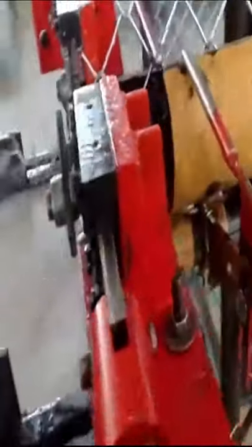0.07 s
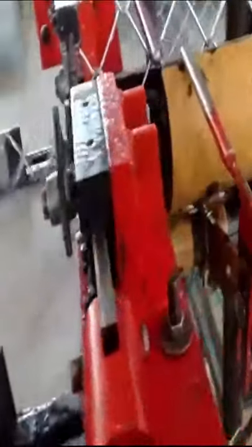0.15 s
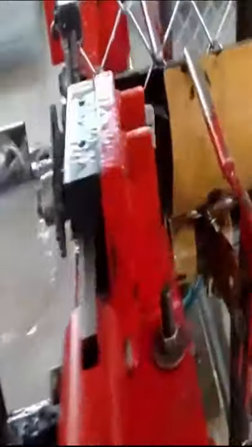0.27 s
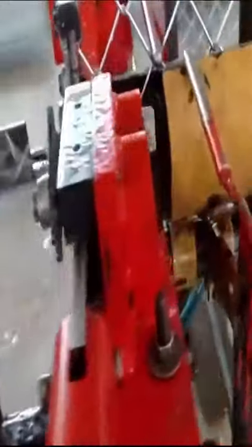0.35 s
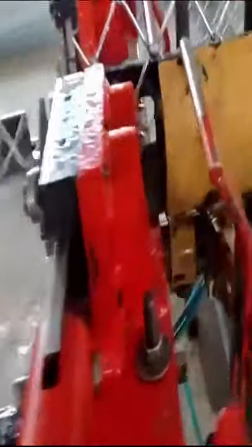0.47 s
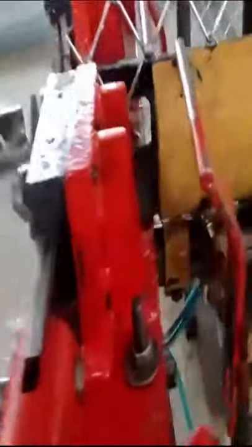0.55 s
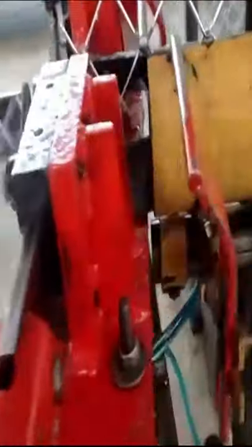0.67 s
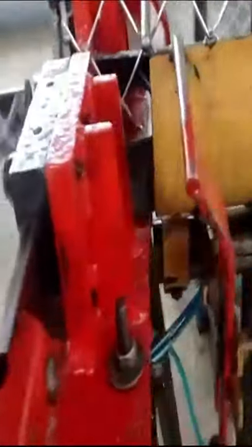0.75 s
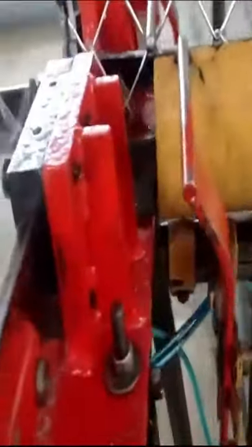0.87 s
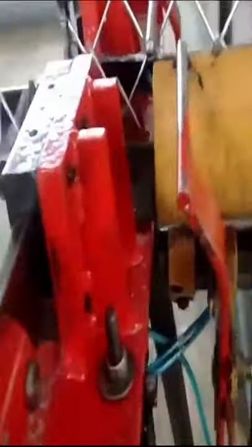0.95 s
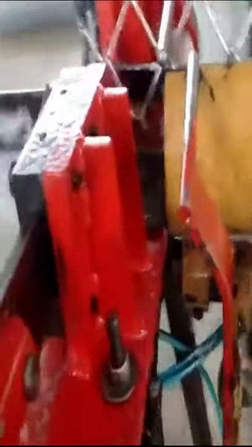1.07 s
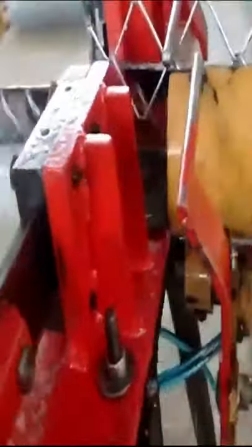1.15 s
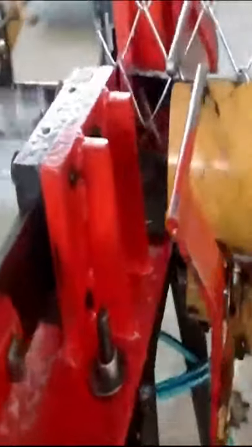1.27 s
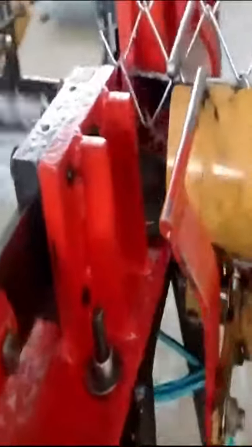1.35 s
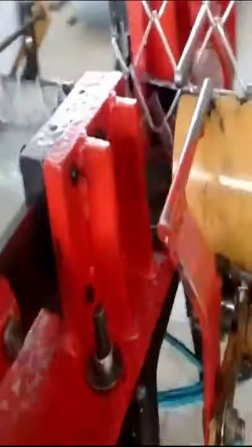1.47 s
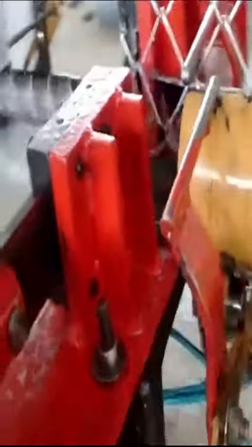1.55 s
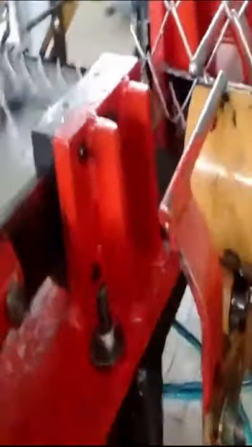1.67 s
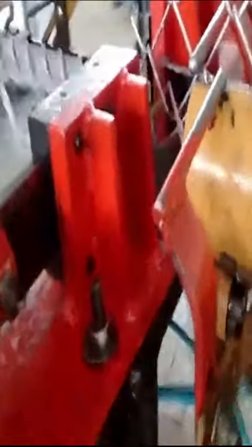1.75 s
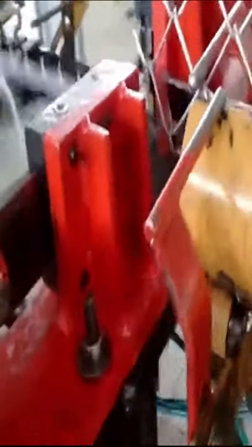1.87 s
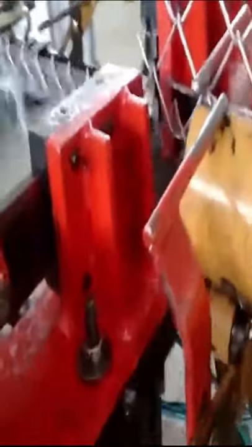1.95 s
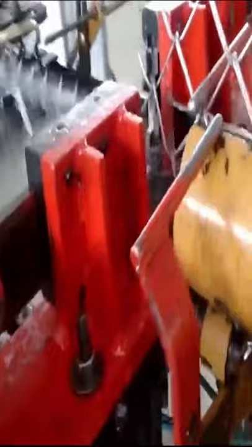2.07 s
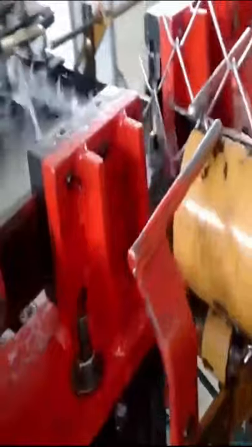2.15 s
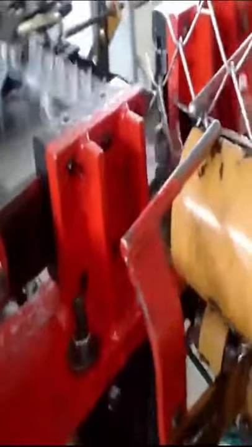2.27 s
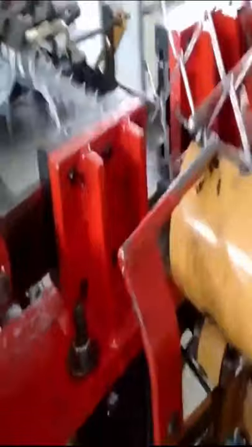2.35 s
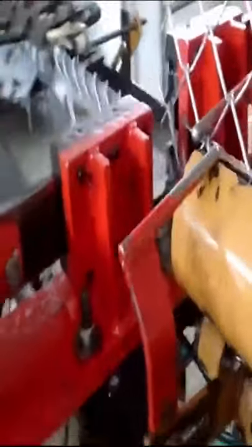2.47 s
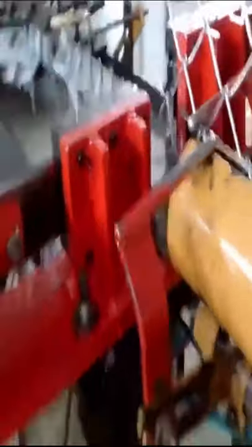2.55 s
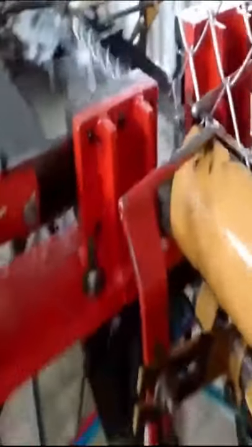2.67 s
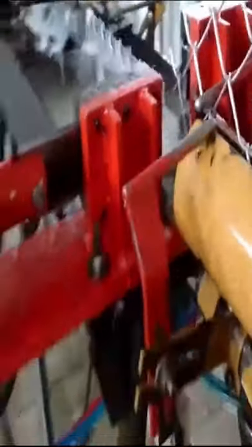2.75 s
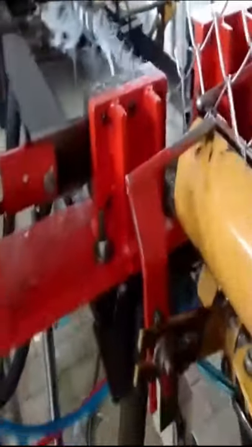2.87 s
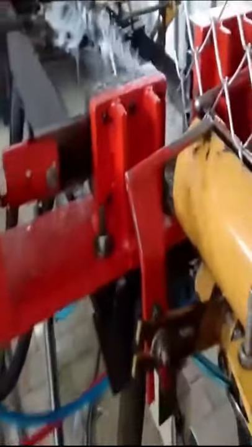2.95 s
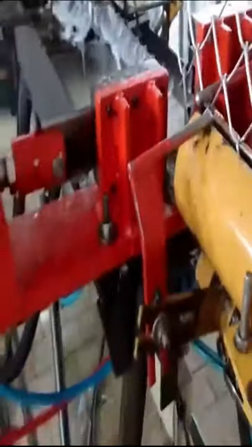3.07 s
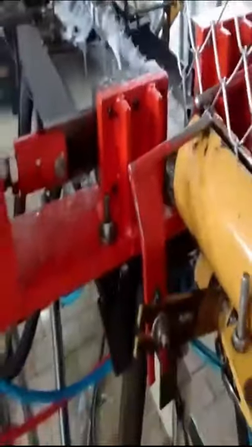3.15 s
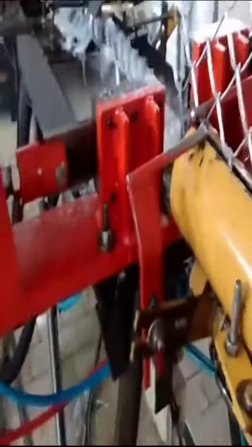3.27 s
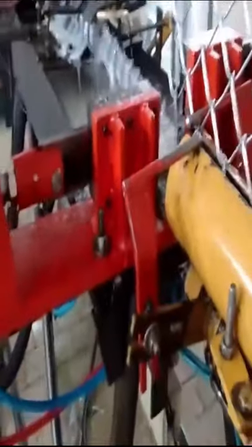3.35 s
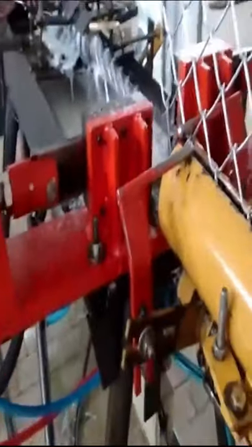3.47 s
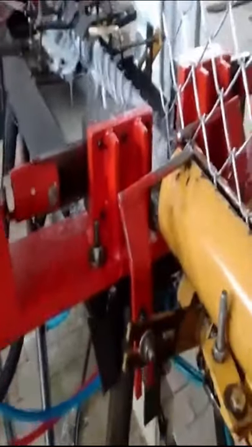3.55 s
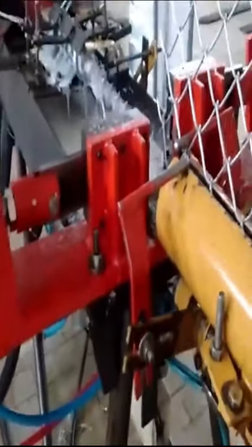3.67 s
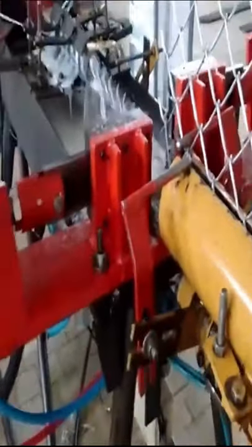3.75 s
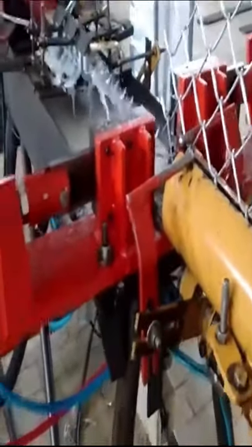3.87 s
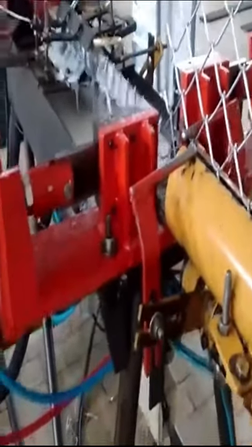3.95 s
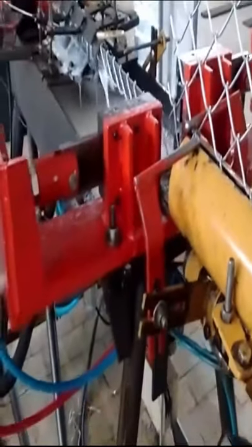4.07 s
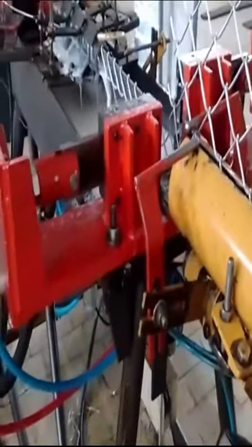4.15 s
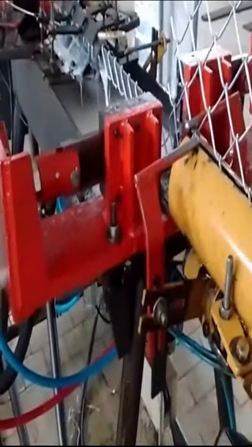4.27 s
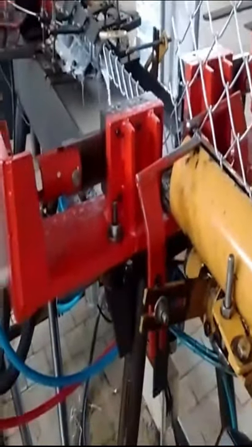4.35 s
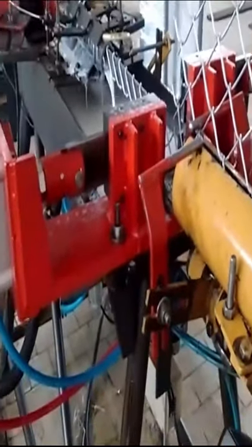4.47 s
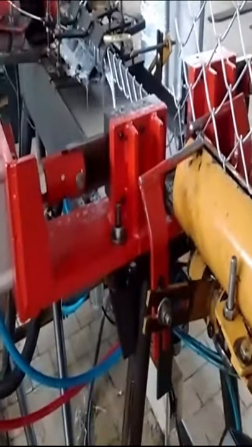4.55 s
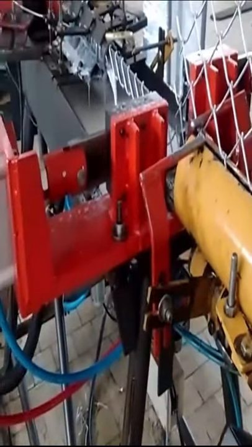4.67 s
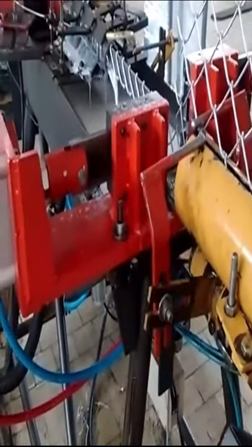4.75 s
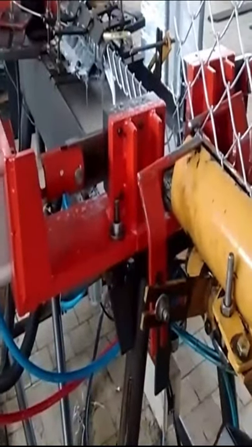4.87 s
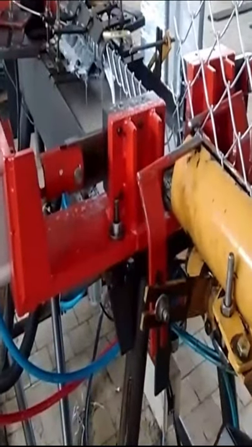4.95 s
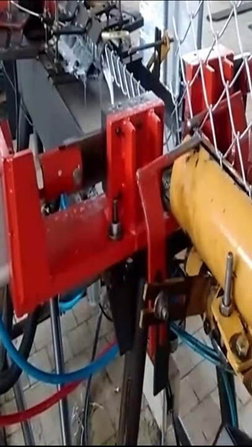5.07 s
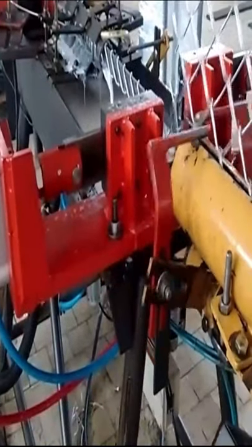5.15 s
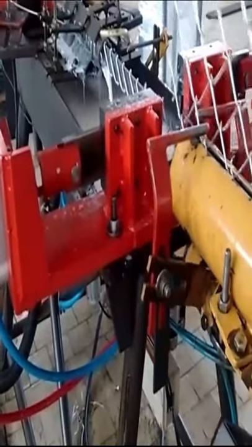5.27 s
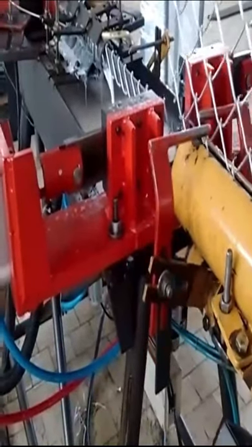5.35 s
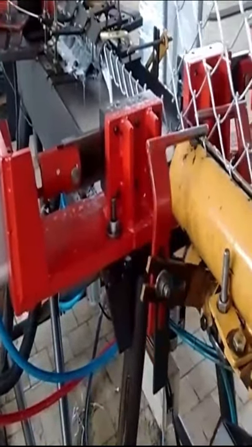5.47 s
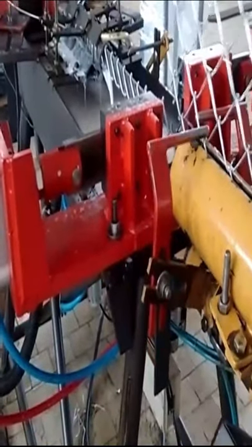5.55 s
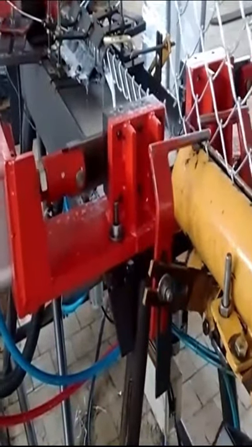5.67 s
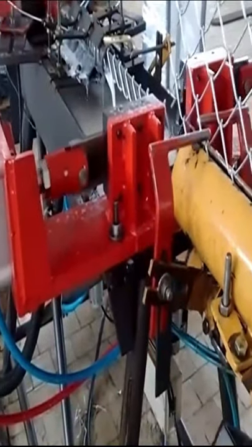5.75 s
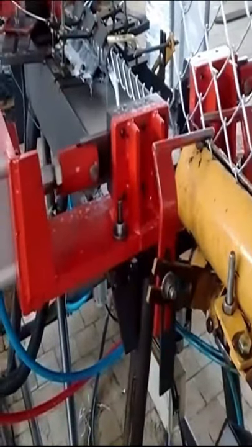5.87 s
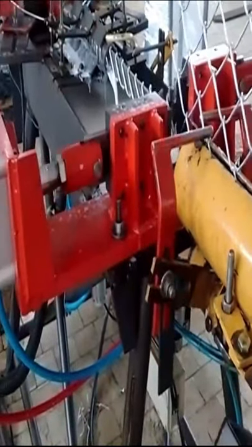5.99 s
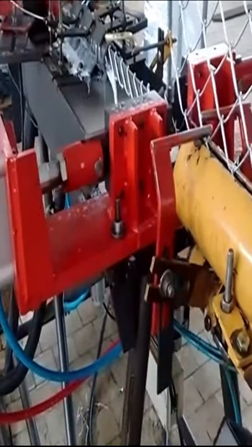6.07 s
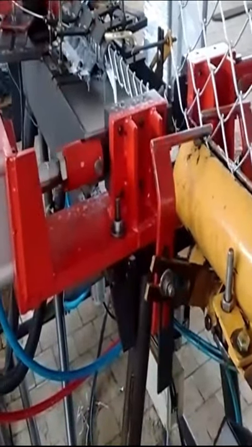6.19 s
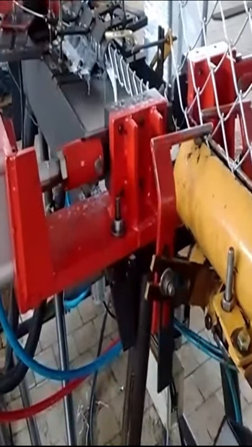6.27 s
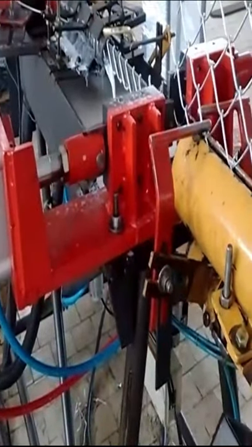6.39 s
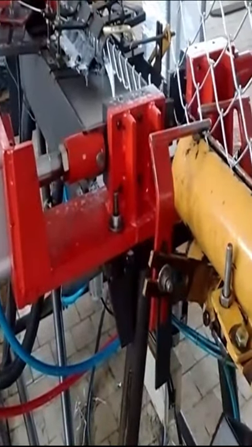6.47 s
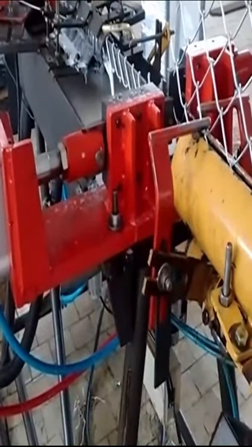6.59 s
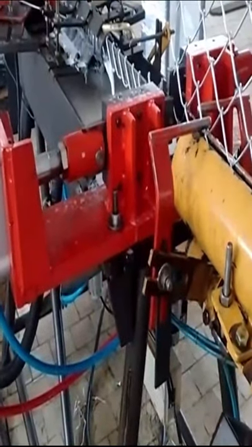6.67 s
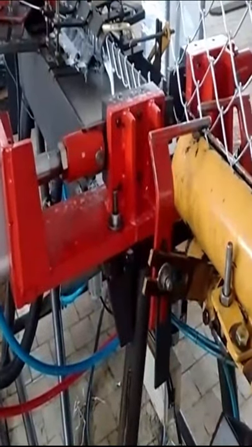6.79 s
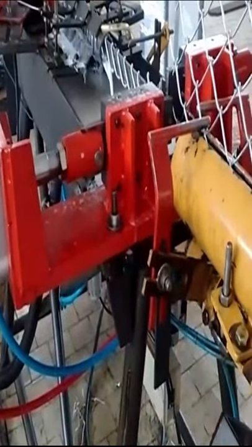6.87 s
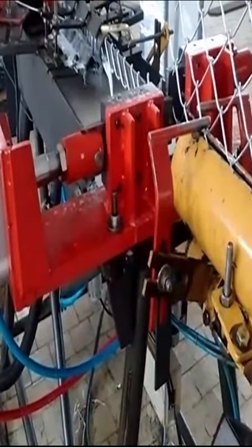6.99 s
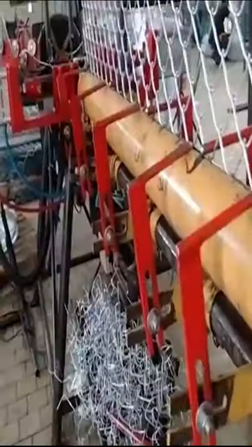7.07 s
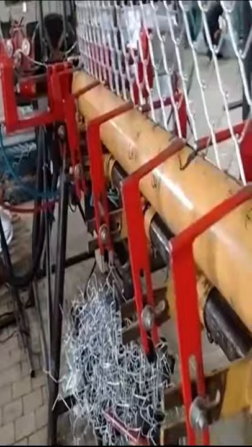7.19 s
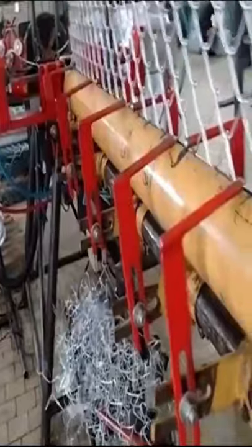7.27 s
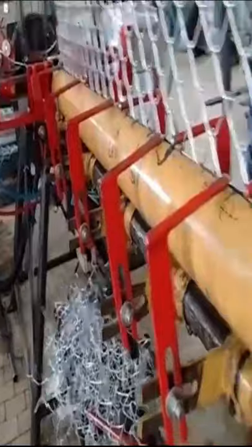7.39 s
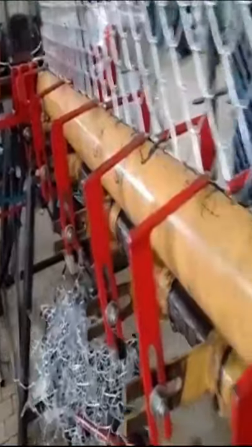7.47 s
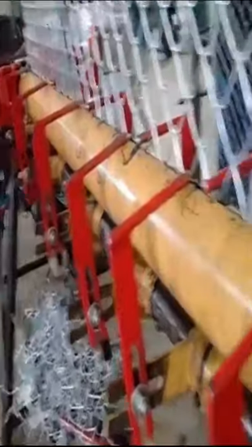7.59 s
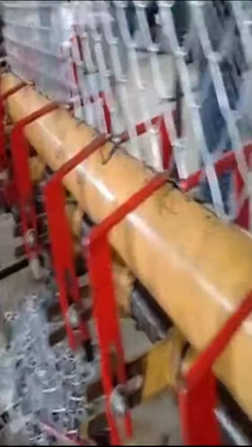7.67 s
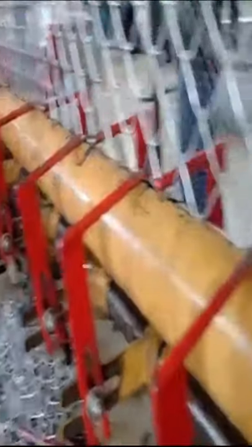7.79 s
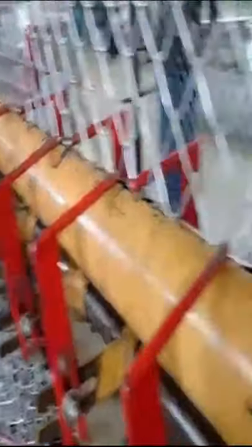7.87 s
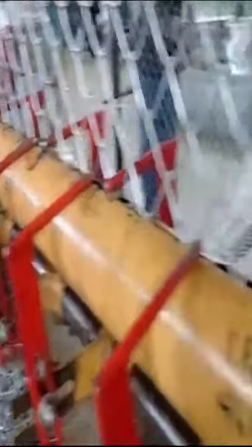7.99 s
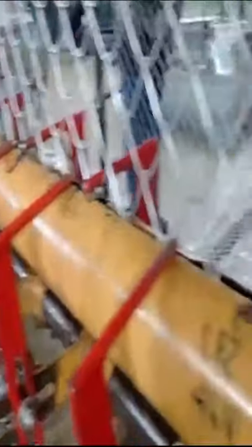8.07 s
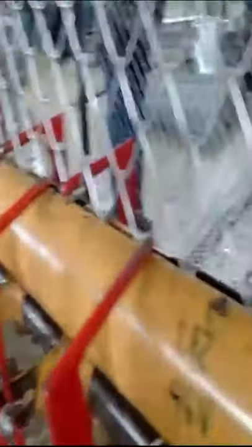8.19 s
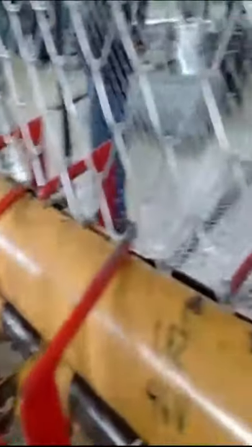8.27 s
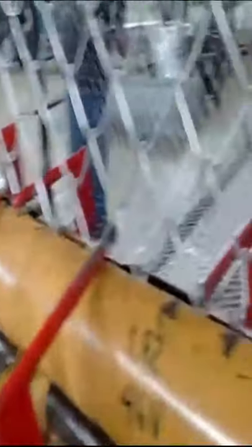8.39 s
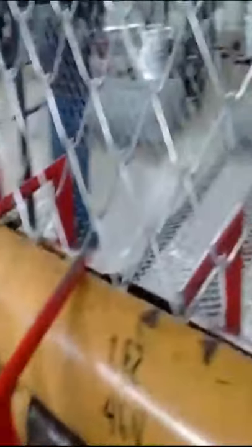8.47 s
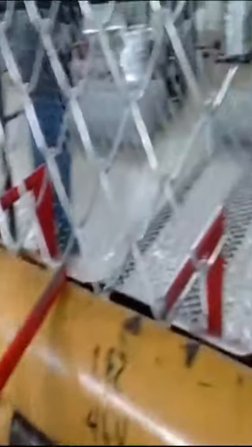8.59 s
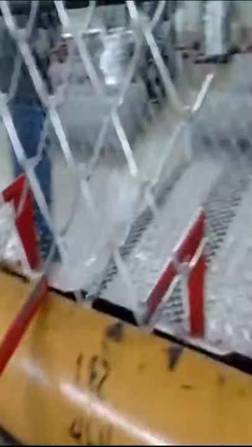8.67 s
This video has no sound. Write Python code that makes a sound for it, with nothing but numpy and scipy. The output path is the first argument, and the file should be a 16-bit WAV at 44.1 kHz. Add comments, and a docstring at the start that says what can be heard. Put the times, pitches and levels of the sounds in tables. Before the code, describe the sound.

Close to a wire mesh machine in an echoing factory hall, about eleven metallic strokes a second clash and ring, growing sharper and thumping the microphones. They stop in a loud blast of air. Motors and distant machines hum on while an actuator groans, more air hisses and a cutter bangs. After a short lull, the drive rattles up again with lighter clatter.

```python
"""A wire weaving machine heard close by: in each run, about eleven strokes a second clash and ring its metal.
The clashes are clustered noise hits striking dying tones, and each one shakes the microphones with a thump.
Air valves blast shaped noise, a cutter bangs, small parts clink, and an actuator groans and tones squeak.
A rattling drive, steady motors and far machines lie beneath; a hall of echoes carries the main sounds on."""
import sys
import numpy as np
from scipy import signal
from scipy.fft import rfft, irfft, next_fast_len
from scipy.io import wavfile
from scipy.ndimage import uniform_filter1d

SR = 44100
rng = np.random.default_rng(int(sys.argv[2]) if len(sys.argv) > 2 else 0)


def log_audio(samples):
    """Write samples as a 16-bit WAV file to the path given in sys.argv[1]."""
    # one column per channel
    frames = np.atleast_2d(samples).T
    # limit to full scale, then quantise
    limited = np.clip(frames, -1, 1)
    pcm = np.round(limited * 32767).astype(np.int16)
    wavfile.write(sys.argv[1], SR, pcm)


N = 384977  # samples in the scene
SIZE = next_fast_len(N)


def amp(db):
    """Turns decibels into a gain."""
    return 10 ** (np.asarray(db) / 20)


def evened(x):
    """Scales a sound to an average (rms) strength of 1."""
    return x / np.sqrt(np.mean(x ** 2) + 1e-20)


def read(points, hz):
    """Reads a table between its points, with pitch on a logarithmic scale."""
    f, value = np.transpose(points)
    return np.interp(np.log(hz + 1), np.log(f + 1), value)


def noise(spectrum, patchy_db, flicker_db):
    """Two unrelated noises of one colour, with shared drifting patches and wide-band flicker."""
    frames, hz = N // 256 + 3, np.fft.rfftfreq(512, 1 / SR)
    a, b, c, d, patches = rng.standard_normal((5, frames, 257))
    flicker = evened(patches.mean(1))[:, None]
    patches = uniform_filter1d(patches, size=2, axis=1)
    patches = evened(uniform_filter1d(patches, size=8, axis=0))
    gain = amp(read(spectrum, hz) + patchy_db * patches + flicker_db * flicker)
    grains = irfft(np.array([a + 1j * b, c + 1j * d]) * gain, 512)
    grains = grains * np.sin(np.pi * np.arange(512) / 512)
    # each grain's first half overlaps the second half of the one before
    overlapped = grains[:, 1:, :256] + grains[:, :-1, 256:]
    return evened(overlapped.reshape(2, -1)[:, :N])


def coloured(gain):
    """Two unrelated steady noises of rms 1, shaped by gain(hz)."""
    z = rfft(rng.standard_normal((2, SIZE))) * gain(np.fft.rfftfreq(SIZE, 1 / SR))
    return evened(irfft(z, SIZE)[:, :N])


def peak(hz, centre_hz, width):
    """Gain of one resonance, strongest at its centre."""
    return 1 / (1 + (2 * (hz - centre_hz) / width) ** 2)


def follow(tables, column):
    """Gain over time from one dB column of several tables, silent outside their times."""
    t, gain = np.arange(N) / SR, np.zeros(N)
    for rows in tables:
        rows = np.array(rows)
        already_on = rows[0, 0] < .001
        inside_s = np.minimum(t - rows[0, 0], rows[-1, 0] - t)
        edge = np.clip(inside_s / 0.0014 + already_on, 0, 1)
        gain += amp(np.interp(t, rows[:, 0], rows[:, column])) * edge
    return gain


def grit(db):
    """Uneven gain that lets single ticks stand out of a noise."""
    steps = np.minimum(rng.exponential(1, N // 16 + 1), 6)
    return evened(amp(db * np.repeat(steps, 16)[:N]))


# how the air sound reaches the two microphones:
# pitch_hz, phase of right on left (half turns), likeness (0-1), diffuse share (0-1)
AIR_PAIR = [(1, 0.36, 0, 0), (280, 0.15, 1, 0.2), (487, -.5, 0.5, 0.36), (1850, 0.45, 1, 0),
            (2970, 0.49, 0, 0), (4160, 2, 0.55, 0.47), (6400, 3, 0.7, 0.32), (8370, 4, 0.6, 0.21),
            (10100, 5, 0.7, 0.67), (12500, 6, 0.7, 0.1), (14300, 3, 0, 0.2), (16700, 4, .2, .05)]
# the same for the shaken mount, opposed in the bass:
# pitch_hz, phase of right on left (half turns), likeness (0-1), diffuse share (0-1)
MOUNT_PAIR = [(1, -1.03, 0.9, 0.16), (497, -0.67, 0.77, 0.28), (1620, -0.12, .4, 0.16)]
# balance between the sides: pitch_hz, left_over_right_db
LEAN = [(60, 0), (180, -1.5), (550, 1.5), (1640, 0), (4950, 0.0), (14900, -1.5)]


def pair(x, table):
    """Sets two microphones apart in phase, differently at each pitch, by mixing a sum and a difference."""
    hz = np.fft.rfftfreq(SIZE, 1 / SR)
    f, *columns = np.transpose(table)
    turns, like, diffuse = (np.interp(hz, f, c) for c in columns)
    like, diffuse, half = np.clip(like, 0, 1), np.clip(diffuse, 0, 1), np.pi * turns / 2
    a, b = rfft(x, SIZE)
    direct, lean = np.sqrt(1 - diffuse ** 2), amp(read(LEAN, hz) / 2)
    mid = direct * np.cos(half) * a + diffuse * abs(np.sin(half)) * b
    partly_like = like * a + np.sqrt(1 - like ** 2) * b
    side = direct * np.sin(half) * partly_like + diffuse * abs(np.cos(half)) * b
    return irfft(np.array([(1j * mid + side) * lean, (1j * mid - side) / lean]), SIZE)[:, :N]


# how long the hall takes to fall by 60 dB: pitch_hz, fall_s
HALL_FALL = [(100, 0.27), (500, 1.5), (1500, 1.82), (4000, 1.09), (8000, 0.89), (14000, 0.66)]


def hall(x):
    """Echoes as sparse taps of random sign, each band dying at its own speed; two tails take turns."""
    size, out = 5 * SR // 4, np.zeros((2, N))
    for turn in (np.cos, np.sin):
        taps = np.zeros((2, size))
        at = np.arange(500, size - 20, 20)
        at = at + rng.integers(0, 20, (2, len(at)))
        np.put_along_axis(taps, at, rng.choice([-1., 1.], at.shape), 1)
        hz, t, z = signal.stft(taps, SR, nperseg=256)
        dying = z * amp(-60 * t / read(HALL_FALL, hz)[:, None])
        tail = signal.istft(dying, SR, nperseg=256)[1]
        share = turn(2 * np.pi * 2.3 * np.arange(N) / SR)
        out += signal.fftconvolve(x * share, tail / np.linalg.norm(tail[0]), axes=1)[:, :N]
    return out


# colour of the far machines: pitch_hz, relative level (dB per Hz)
FACTORY_COLOUR = [(40, -33), (100, -15), (200, -2.5), (400, -7), (700, 0), (1200, -6.5), (2000, -5.5),
                  (3200, -7), (5000, -8), (7500, -13), (10500, -17), (13000, -33), (15500, -28.0)]
# their hums: pitch_hz, relative level_db, width_hz
FACTORY_HUMS = [(118, -13, 7), (464, -10, 3.9), (565, 1.5, 28), (688, -6, 4.3), (740, 0, 21), (1422, 3, 46),
                (4070, 6, 710), (5150, -11, 20)]
WASH_DB, HUMS_DB = -40.5, -48.0


def factory():
    """Far machines: a wash of noise, and motor hums that waver because they are narrow noise."""
    def hum_gain(hz):
        """Several resonances side by side."""
        return sum(amp(db) * peak(hz, f, width) / np.sqrt(width) for f, db, width in FACTORY_HUMS)
    wash = noise(FACTORY_COLOUR, patchy_db=4.5, flicker_db=0.5)
    return amp(WASH_DB) * wash + amp(HUMS_DB) * coloured(hum_gain)


# motor tones: start_s, end_s, pitch_hz, level_db before the waver
MOTOR_TONES = [(-2, 10, 118.4, -56.5), (6.5, 7.1, 255, -51), (8, 10, 70, -49), (8, 10, 91.5, -48.5),
               (7.5, 10, 275, -50)]
MOTOR_FADE_S, WAVER_DB = 0.1, 3.0


def motors():
    """Pure tones of steady pitch whose level wavers slowly."""
    t, out = np.arange(N) / SR, np.zeros(N)
    wavers = rng.standard_normal((len(MOTOR_TONES), 60))
    for (start, end, hz, db), points in zip(MOTOR_TONES, wavers):
        waver = np.interp(t, np.linspace(0, t[-1], len(points)), points)
        fade = np.clip(np.minimum(t - start, end - t) / MOTOR_FADE_S, 0, 1)
        out += amp(db + WAVER_DB * waver) * np.sin(2 * np.pi * hz * t) * fade
    return out


# the drive's two runs, each a list of: time_s, drone_db, mesh_rattle_db, deep_rumble_db
DRIVE_RUNS = [
    [(0.0, -28, -27, -41.5), (0.6, -28.5, -26, -53), (1.1, -36.5, -28.5, -56), (1.8, -35, -27.5, -68),
     (2.4, -33.5, -23, -67), (3.0, -33, -22, -61), (3.55, -35.5, -20.5, -67), (3.77, -37.5, -30, -62),
     (4.0, -36, -31, -59), (4.11, -27, -18, -50)],
    [(7.2, -45, -76, -45), (7.55, -45, -52, -48), (7.79, -36.5, -34, -42), (7.84, -33, -30.5, -43),
     (7.93, -33, -28.5, -46), (8.12, -21.5, -21, -37.5), (8.225, -21, -25.5, -36), (8.29, -28.5, -36, -46),
     (8.44, -25, -28, -39), (8.73, -28, -28, -47)],
]
# drone of the first run, close to the drive: pitch_hz, relative level (dB per Hz)
DRONE_FIRST = [(60, -52), (120, -25), (250, -15.5), (420, -2), (560, 3.5), (900, -2.5), (1250, -4.5),
               (1900, -12), (2400, -11), (4000, -24)]
# drone of the second run, further along the frame: pitch_hz, relative level (dB per Hz)
DRONE_SECOND = [(60, -52), (120, -22), (250, -14.5), (420, -6.5), (560, 0), (800, -2.5), (1300, -4),
                (2200, -5.5), (4000, -32)]
# rattle of the mesh: pitch_hz, relative level (dB per Hz)
RATTLE_COLOUR = [(800, -62), (2000, -1), (3200, -2), (5000, -0.5), (7500, 0), (10500, -2.5), (13000, -11),
                 (15500, -14.5)]
# deep rumble: pitch_hz, relative level (dB per Hz)
DEEP_COLOUR = [(30, -16), (60, -12), (110, 4.5), (180, -1), (280, 5), (450, -9), (900, -67)]


def drive():
    """The running drive drones and rumbles low while the mesh rattles above, all as shaped noise."""
    drone = 0
    for colour, run in zip((DRONE_FIRST, DRONE_SECOND), DRIVE_RUNS):
        drone = drone + noise(colour, patchy_db=2.0, flicker_db=0.7) * follow([run], column=1)
    deep = coloured(lambda hz: amp(read(DEEP_COLOUR, hz))) * follow(DRIVE_RUNS, column=3)
    rattle = noise(RATTLE_COLOUR, patchy_db=4.0, flicker_db=-0.9) * grit(db=-0.5)
    return drone + deep + rattle * follow(DRIVE_RUNS, column=2)


# a thin squeak, and low moans around the first blast: start_s, length_s, pitch_hz, level_db
SQUEAK_TONES = [(7.465, 0.1, 4995, -36), (3.9, 0.15, 222, -44.5), (4.41, 0.18, 224, -44),
                (4.28, 0.14, 442, -45), (4.43, 0.13, 440, -49)]


def squeak():
    """Pure tones that swell and fade, each under one arch."""
    t, out = np.arange(N) / SR, np.zeros(N)
    for s, length, hz, db in SQUEAK_TONES:
        arch = np.sin(np.pi * np.clip((t - s) / length, 0, 1))
        out += amp(db) * arch * np.sin(2 * np.pi * hz * t)
    return out


# an actuator groans as the hooks shift: time_s, level_db
GROAN_LEVEL = [(5.333, -36.5), (5.39, -42), (5.44, -25), (5.55, -29.5), (5.79, -31.5)]
# its resonances: pitch_hz, width_hz, relative level_db
GROAN_MODES = [(582, 32, -1), (730, 130, -12), (1460, 30, -12), (1587, 24, -13), (2020, 40, -11.5),
               (2500, 40, -12), (1000, 10400, -18)]


def groan():
    """Noise in narrow resonances over a broad one."""
    sound = coloured(lambda f: sum(amp(db) * peak(f, hz, width) for hz, width, db in GROAN_MODES))
    return sound * follow([GROAN_LEVEL], column=1)


# small parts clinking: start_s, relative level_db, pitch_hz, width of the tick (Hz), fall by 60 dB (s)
CLINK_HITS = [(4.997, -36.5, 4000, 11, 0.42), (5.006, -33.5, 2970, 28000, 0.62),
              (5.301, -33, 8090, 1500, 0.16), (5.333, -29.5, 577, 21, 0.21), (5.44, -20.5, 4990, 580, 0.16),
              (6.639, -19, 8000, 57, 0.14), (7.228, -26, 7940, 5200, 0.043),
              (7.83, -26.5, 1490, 2600, 0.62)]


def clinks():
    """Each clink wavers around its pitch: narrow ones ring clean, wide ones tick."""
    out, t = np.zeros((2, N + SR)), np.arange(SR // 2) / SR
    for s, db, hz, width, t60 in CLINK_HITS:
        smoothing = [1, -np.exp(-np.pi * width / SR)]
        a, b = signal.lfilter([1], smoothing, rng.standard_normal((2, 2, len(t))))
        sine = np.sin(2 * np.pi * hz * t)
        tick = evened(a * np.cos(2 * np.pi * hz * t) + b * sine)
        tick = evened(tick + 60. / (width + 20.) * sine)
        envelope = amp(db - 2.0 - 60 * t / t60) * np.minimum(t / 0.00096, 1)
        start = round(s * SR)
        out[:, start:start + len(t)] += envelope * tick
    return out[:, :N]


# dull knocks close to the microphones:
# start_s, level_db, pitch_hz, fall by 60 dB (s), push 1 or pull -1
POP_HITS = [(1.1072, -3.5, 118, 0.03, -1), (1.199, -21, 108, 0.022, -1), (1.995, -17, 105, 0.06, 1),
            (2.0325, 3.5, 170, 0.022, 1), (2.052, -22, 122, 0.046, 1), (5.818, -9, 100, 0.035, -1),
            (6.611, -10, 107, 0.1, -1)]


def pops():
    """A quick push or pull that swings to and fro and dies."""
    t, out = np.arange(N) / SR, np.zeros(N)
    for s, db, hz, t60, way in POP_HITS:
        since = np.maximum(t - s, 0)
        swing = np.sin(2 * np.pi * hz * since) * (1 - np.exp(-since / 0.0017))
        out += np.sign(way) * amp(db - 60 * since / t60) * swing
    return out


# colour of thumps and gusts: pitch_hz, relative level (dB per Hz)
THUMP_COLOUR = [(25, -23), (60, -9.5), (140, -3), (300, -5.5), (600, -9), (1200, -14), (2500, -18),
                (5000, -115)]


def rumble(lumpy_db):
    """Low noise in uneven lumps, as air or a shaken mount pushes the microphones."""
    lumps = uniform_filter1d(rng.standard_normal(N), size=300)
    lumps = evened(uniform_filter1d(lumps, size=300))
    return evened(coloured(lambda hz: amp(read(THUMP_COLOUR, hz))) * amp(lumpy_db * lumps))


VALVE_S, SHUT_S = 0.016, 0.03  # a valve closes more softly than it opens


def valve(opens, fullest, shuts, db, snap_db, sag_db):
    """Gain of a jet of air: it snaps part open, swells to full, sags steadily and shuts."""
    t = np.arange(N) / SR
    swell_db = snap_db * np.clip((fullest - t) / (fullest - opens), 0, 1)
    edge = np.clip(np.minimum((t - opens) / VALVE_S, (shuts - t) / SHUT_S), 0, 1)
    return amp(db + swell_db + sag_db * np.maximum(t - fullest, 0)) * edge


# air blasts: opens_s, fullest_s, shuts_s, hiss_db, snap relative to full (dB), hiss sag (dB per s),
# buffeting of the microphones (dB), buffeting sag (dB per s), buffeting_ends_s
AIR_BLASTS = [(4.114, 4.188, 4.254, -8.5, -14.5, -50, -10, -120, 4.295),
              (4.302, 4.313, 4.45, -15.5, -6, -96, -35, -40, 4.4),
              (5.397, 5.457, 5.8, -24.5, -13.5, -51, -50, -40, 5.8),
              (5.8, 5.895, 6.17, -16.5, -3, -104, -18, -80, 5.965)]
# the last valve bleeds on: time_s, hiss_db
VALVE_BLEED = [(5.96, -31.5), (6.155, -21.5), (6.2, -63), (6.3, -31.5), (6.575, -35.5)]
# colour of the hiss: pitch_hz, relative level (dB per Hz)
HISS_COLOUR = [(40, -30), (100, -54), (200, -54), (400, -46.5), (700, -14), (1200, -8), (2000, -5.5),
               (3200, -4), (5000, 1.5), (7500, 0.5), (10500, -0.5), (13000, -6.5), (15500, -2)]


def air_valves():
    """Jets of air: their noisy hiss, and the strength of the gusts that buffet the microphones."""
    jets = sum(valve(*row[:6]) for row in AIR_BLASTS)
    buffeting = sum(valve(opens, full, ends, db, snap, sag)
                    for opens, full, _, _, snap, _, db, sag, ends in AIR_BLASTS)
    air = noise(HISS_COLOUR, patchy_db=4.5, flicker_db=0.5)
    return air * (jets + follow([VALVE_BLEED], column=1)), buffeting


def bursts(times, levels_db, lengths, rises, t60, sag_db):
    """Envelopes that rise, sag through their length and die."""
    out, t = np.zeros(N + SR), np.arange(SR // 4) / SR
    for s, db, length, rise in zip(times, levels_db, lengths, rises):
        shape = np.minimum(t / rise, 1) * amp(sag_db * t - 60 * np.maximum(t - length, 0) / t60)
        out[round(s * SR):][:len(t)] += amp(db) * shape
    return out[:N]


def ring(x, modes):
    """Lets x strike a set of dying tones; the overall gain is 1 on white noise."""
    t = np.arange(0, min(max(t60 for hz, db, t60 in modes), 1), 1 / SR)
    body = sum(amp(db - 60 * t / t60) * np.sin(2 * np.pi * hz * t) / np.sqrt(t60) for hz, db, t60 in modes)
    return signal.oaconvolve(x, body[None] / np.linalg.norm(body), axes=1)[:, :N]


BOUNCES_PER_S, BOUNCE_S, BOUNCE_SHARE = 300, .002, .32  # a clash is a cluster of quick separate hits


def bounces():
    """Gain in which short hits of uneven size stand out of a steady scrape."""
    hits = (rng.random(N) < BOUNCES_PER_S / SR) * rng.exponential(1, N)
    hits = signal.lfilter([1], [1, -np.exp(-1 / (BOUNCE_S * SR))], hits)
    return evened(1 - BOUNCE_SHARE + BOUNCE_SHARE * evened(hits))


# the wire sits differently at each blow: share of pitch, spread of tone levels, number of sittings in turn
RETUNE, RECOLOUR_DB, SETUPS = .009, 4, 11
GRIT_DB = 0.1  # single wire ticks stand out of the clash


def blows(rows, spectrum, modes, ring_db, patchy_db, crest_db, rises, sag_db, t60, thump_t60):
    """A burst of clashing metal, the tones it rings, and the envelope of a low thump a moment later."""
    s, db, thump_db, length = np.transpose(rows)
    start, lasting, clash_db = s - rises / 2, length + rises / 2, db - crest_db
    clash = noise(spectrum, patchy_db, flicker_db=0.0) * grit(GRIT_DB) * bounces()
    out = clash * bursts(start, clash_db, lasting, rises, t60, sag_db)
    shocks, sitting = rng.standard_normal((2, N)) * bounces(), np.arange(len(s)) % SETUPS
    for k in np.unique(sitting):
        # the first sitting keeps the tones as listed
        changes = rng.standard_normal((len(modes), 2)) * (k > 0)
        shifted = [(hz * (1 + RETUNE * a), mode_db + RECOLOUR_DB * b, ring_s)
                   for (hz, mode_db, ring_s), (a, b) in zip(modes, changes)]
        chosen = [v[sitting == k] for v in (start, clash_db + ring_db, lasting, rises)]
        out = out + ring(shocks * bursts(*chosen, t60=0.042, sag_db=sag_db), shifted)
    thump = bursts(s + 0.001, thump_db, length, np.full_like(s, 0.0029), thump_t60, sag_db)
    return out, thump


def knocks(rows, over_thump_db, low_hz, high_hz, t60):
    """Each blow also rocks the frame: a few cycles of a low, quickly dying swing."""
    out, t = np.zeros(N + SR), np.arange(SR // 5) / SR
    for (s, db, thump_db, length), (pitch, sign) in zip(rows, rng.random((len(rows), 2))):
        hz = low_hz + pitch * (high_hz - low_hz)
        swing = np.sin(2 * np.pi * hz * t) * np.sign(sign - .5)
        out[round((s + .003) * SR):][:len(t)] += amp(thump_db + over_thump_db - 60 * t / t60) * swing
    return out[:N]


# the cutter's bang: time_s, relative clash_db, relative thump_db, length_s
CUTTER_BLOW = [(6.587, -2.1, -15.5, 0.034)]
# colour of its clash: pitch_hz, relative level (dB per Hz)
CUTTER_COLOUR = [(120, -11), (300, -4), (700, -8.5), (1200, 1), (2000, -8), (3200, -6), (5000, -8.5),
                 (7500, -8.5), (10500, -12.5), (15500, -20)]
# tones it rings: pitch_hz, relative level_db, fall by 60 dB (s)
CUTTER_MODES = [(883, -18, 0.2), (910, -21, 0.2), (1034, -9, 0.2), (1040, -7, 0.2), (1120, -18, 0.2),
                (1185, -10, 0.17), (1209, -14, 0.2), (1324, -11, 0.2), (1400, -8, 0.2), (1442, -8, 0.28),
                (1522, -9, 0.22), (1774, -10, 0.1), (1930, -6, 0.09), (2160, -13.5, 0.13),
                (4260, -13, 0.12), (4450, -11, 0.12)]


def cutter():
    """The cutter bangs: a noisy clash that rings its metal, and the strength of its thump."""
    return blows(CUTTER_BLOW, CUTTER_COLOUR, CUTTER_MODES, ring_db=-8, patchy_db=0.7, crest_db=4.5,
                 rises=np.array([0.008]), sag_db=-64.0, t60=0.32, thump_t60=0.1)


# weaving strokes: time_s, relative clash_db, relative thump_db, length of the clash (s)
WEAVING_STROKES = [(0.087, -10, -36, 0.025), (0.152, -14, -38, 0.017), (0.267, -6, -40, 0.11),
                   (0.3687, -11, -35, 0.0096), (0.479, -17, -44, 0.0074), (0.5524, -20, -47, 0.033),
                   (0.65, -7, -35, 0.019), (0.735, -7.5, -43, 0.035), (0.836, -6.5, -30, 0.03),
                   (0.916, -7, -45, 0.015), (0.9997, -9, -36, 0.06), (1.105, -2, -24, 0.008),
                   (1.187, -9, -37, 0.03), (1.282, -11, -48, 0.0042), (1.362, -5.5, -34, 0.048),
                   (1.4568, -4, -30, 0.027), (1.545, -6.5, -31, 0.018), (1.645, -4.5, -26, 0.013),
                   (1.738, -9, -54, 0.011), (1.831, -7.5, -57, 0.015), (1.926, -10, -40, 0.0087),
                   (1.997, -17.5, -36, 0.023), (2.033, -29, -26, 0.0032), (2.083, -9, -45, 0.05),
                   (2.173, -3.5, -21.5, 0.031), (2.264, -4.5, -36, 0.016), (2.356, -5, -30, 0.017),
                   (2.4488, -5.5, -19.5, 0.018), (2.533, -4.5, -25, 0.032), (2.6328, -5.5, -24.5, 0.0087),
                   (2.717, -5, -20, 0.017), (2.806, -4, -17, 0.018), (2.895, -3, -11.5, 0.018),
                   (2.988, -1, -11.5, 0.019), (3.0788, -2.5, -12.5, 0.025), (3.169, -2, -19.5, 0.017),
                   (3.26, -2.5, -12, 0.018), (3.3505, 0.5, -12, 0.017), (3.4393, -4.5, -13.5, 0.024),
                   (3.531, -4, -15, 0.013), (3.6237, -7.5, -32, 0.02), (3.719, -10.5, -44, 0.029),
                   (3.9719, -3, -20.5, 0.066), (4.0681, -2, -14, 0.012), (8.227, -9.5, -42, 0.0052),
                   (8.322, -14, -46, 0.018), (8.452, -11, -46, 0.017), (8.5127, -15.5, -44, 0.013),
                   (8.617, -8, -46, 0.013), (8.71, -13.5, -44, 0.023)]
# colour of the clash: pitch_hz, relative level (dB per Hz)
CLASH_COLOUR = [(150, -40), (400, -6), (700, 0.5), (1200, -0.5), (2000, -2), (3200, -2), (5000, 1.5),
                (7500, 4.5), (10500, 1), (13000, -5.5), (15500, -3)]
# tones of frame and wire: pitch_hz, relative level_db, fall by 60 dB (s)
FRAME_MODES = [(678, -12.5, 0.11), (1180, -22.5, 0.093), (1397, -16.5, 0.23), (1644, -13, 0.18),
               (1810, -12.5, 0.27), (1987, -10, 0.11), (2236, -10.5, 0.14), (3330, -3.5, 0.17),
               (3500, -9, 0.14), (3587, -7, 0.18), (4140, -0.5, 0.053), (4420, -4.5, 0.043),
               (4800, -7.5, 0.069), (5020, -8, 0.068), (5450, -9.5, 0.16), (5680, -2, 0.079),
               (6130, -1.5, 0.098), (7500, -19, 0.08), (7540, -20, 0.11), (8449, -3.5, 0.14),
               (9150, -20, 0.13)]
# the frame rings more as the first run gets going: time_s, ring_over_clash_db
RING_LEVEL = [(0, -35), (1.3, -7), (1.7, 1), (4.1, 1), (8.7, 1)]
# strokes bite faster as the run gets going: time_s, rise_s
STROKE_RISE = [(0, 0.013), (2.0, 0.011), (2.7, 0.006), (3.0, 0.004), (4.1, 0.0036), (8.2, 0.004)]
RING_SPREAD_DB = 1  # from blow to blow


def weaving():
    """Strokes clash the wire and ring the frame; also gives the strength of their thumps."""
    times = np.array(WEAVING_STROKES)[:, 0]
    ring_db = np.interp(times, *np.transpose(RING_LEVEL))
    ring_db = ring_db + RING_SPREAD_DB * rng.standard_normal(len(times))
    rises = np.interp(times, *np.transpose(STROKE_RISE))
    return blows(WEAVING_STROKES, CLASH_COLOUR, FRAME_MODES, ring_db, patchy_db=3.5, crest_db=9.5,
                 rises=rises, sag_db=-180., t60=0.22, thump_t60=0.061)


def scene():
    """Sound reaches the microphones through the air; thumps and gusts also shake them directly."""
    background = factory() + motors() + drive()
    small = clinks() + groan() + squeak()
    hiss, buffeting = air_valves()
    cut, jolt = cutter()
    weave, shake = weaving()
    pushes = rumble(lumpy_db=1.0) * (shake + jolt + buffeting) + pops()
    all_blows = np.vstack([WEAVING_STROKES, CUTTER_BLOW])
    pushes = pushes + knocks(all_blows, over_thump_db=0.5, low_hz=91.0, high_hz=190.0, t60=0.07)
    into_hall = amp(-7.5) * weave + amp(-9.0) * cut + amp(-1.5) * hiss
    into_hall = into_hall + amp(-12.0) * small + amp(-32.0) * pushes
    airborne = background + small + hiss + cut + weave + hall(into_hall)
    return pair(airborne, AIR_PAIR) + pair(pushes, MOUNT_PAIR)


BASS_CUT_HZ, TREBLE_LIMIT_HZ = 56, 15520


def record(dry):
    """The microphones lose the deepest bass; then come clipping and the treble limit."""
    thinned = signal.lfilter(*signal.butter(2, BASS_CUT_HZ, "high", fs=SR), dry)
    limit = signal.firwin(511, TREBLE_LIMIT_HZ, window=("kaiser", 9), fs=SR)
    return signal.oaconvolve(np.clip(thinned, -1, 1), limit[None], "same")


dry = scene()
out = record(dry)
log_audio(out)
```